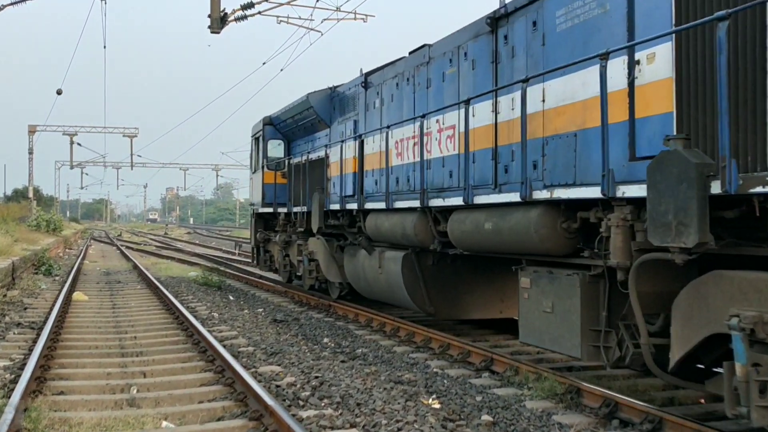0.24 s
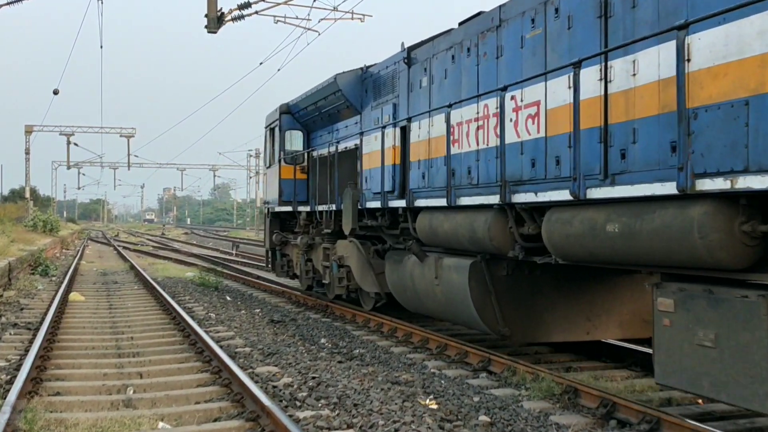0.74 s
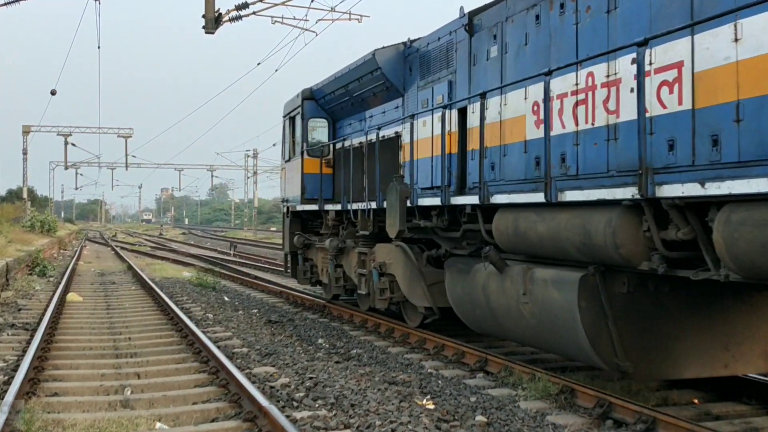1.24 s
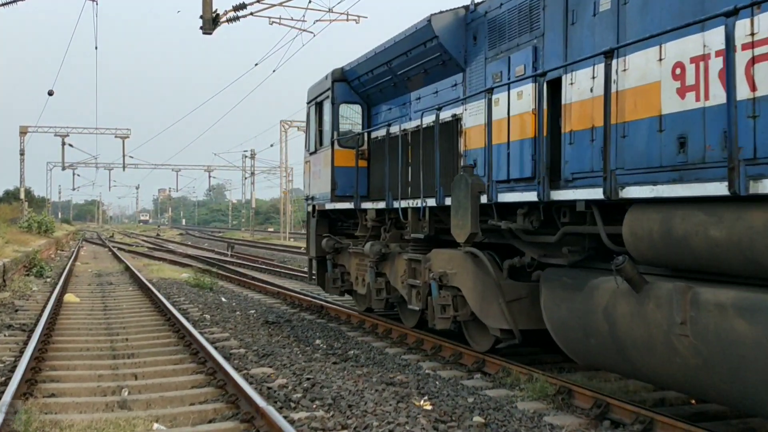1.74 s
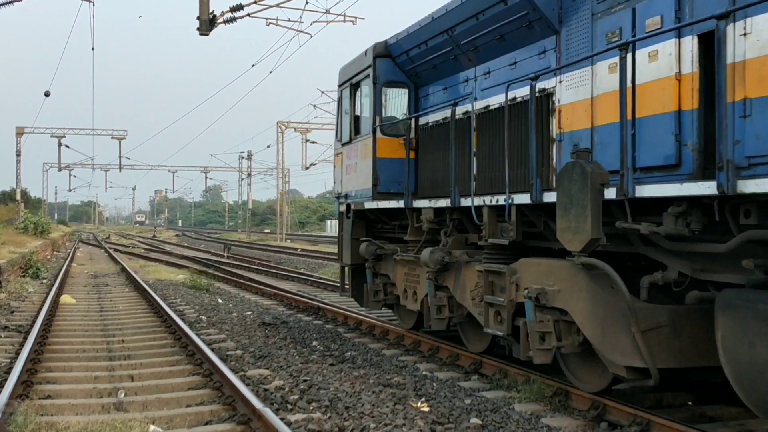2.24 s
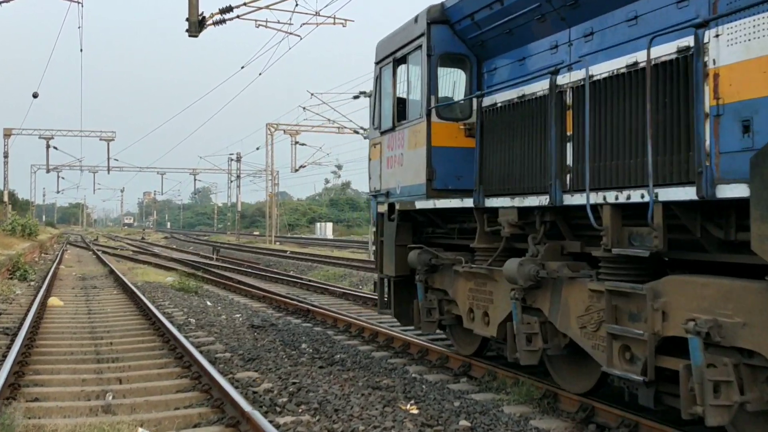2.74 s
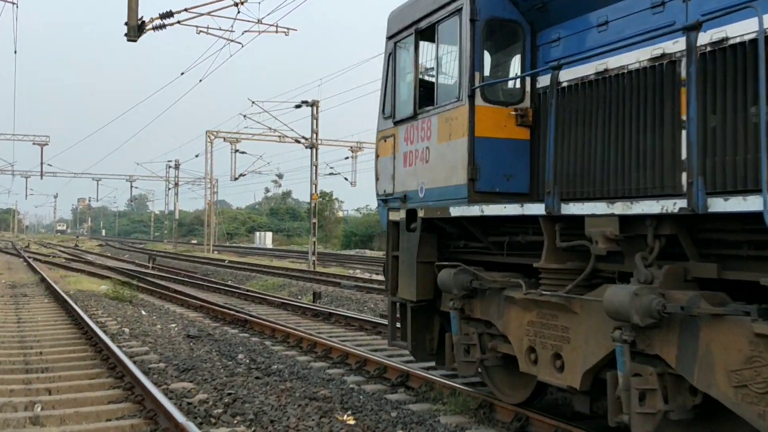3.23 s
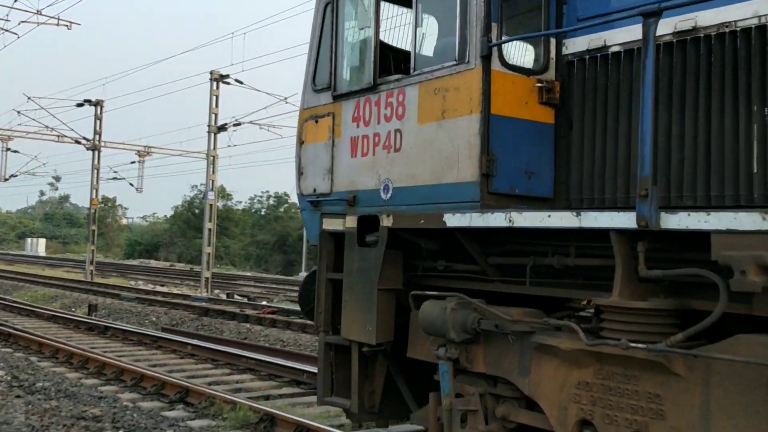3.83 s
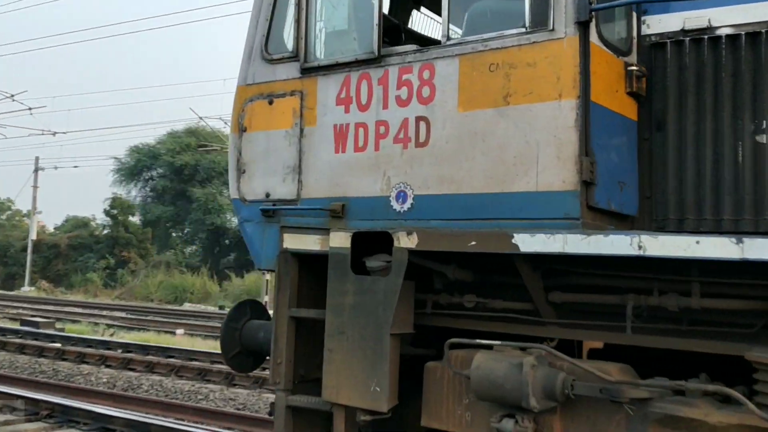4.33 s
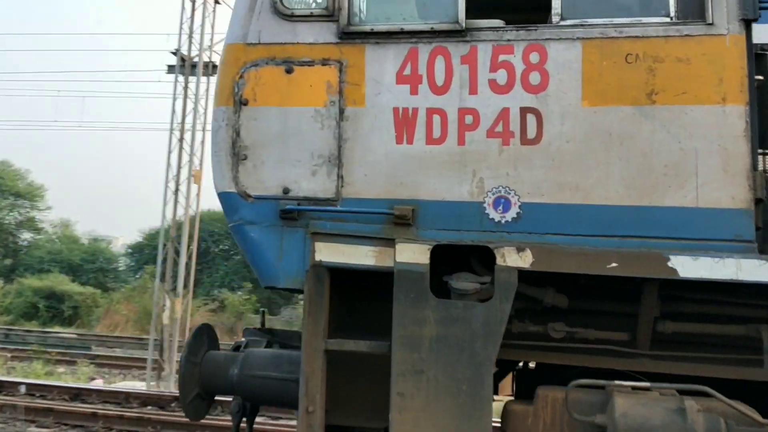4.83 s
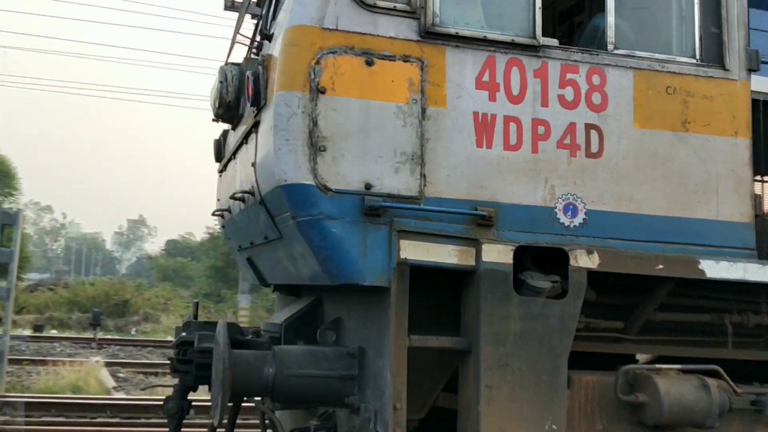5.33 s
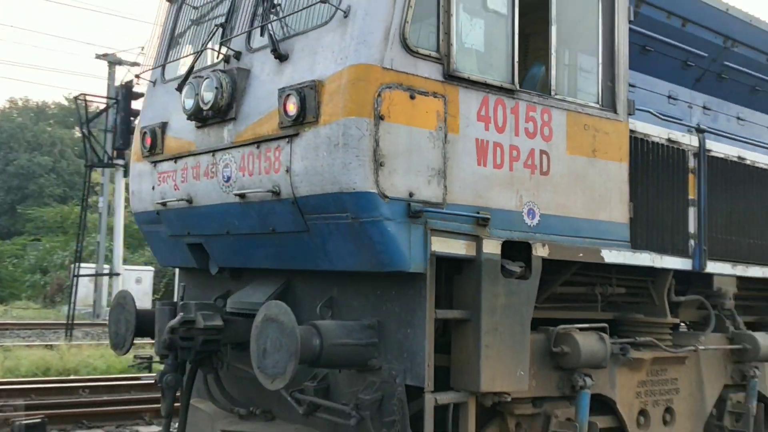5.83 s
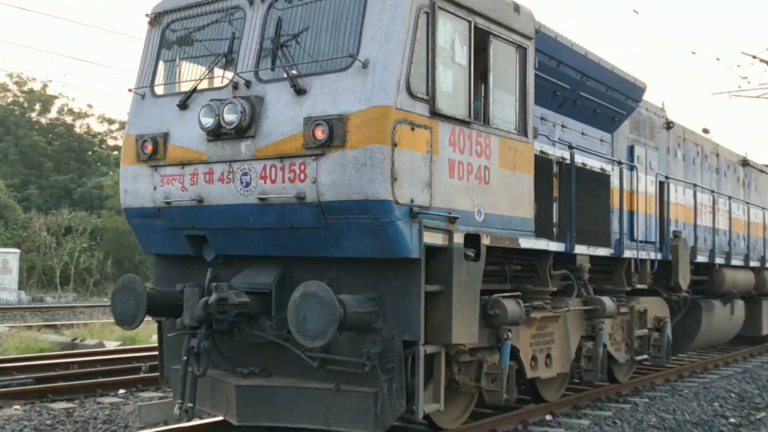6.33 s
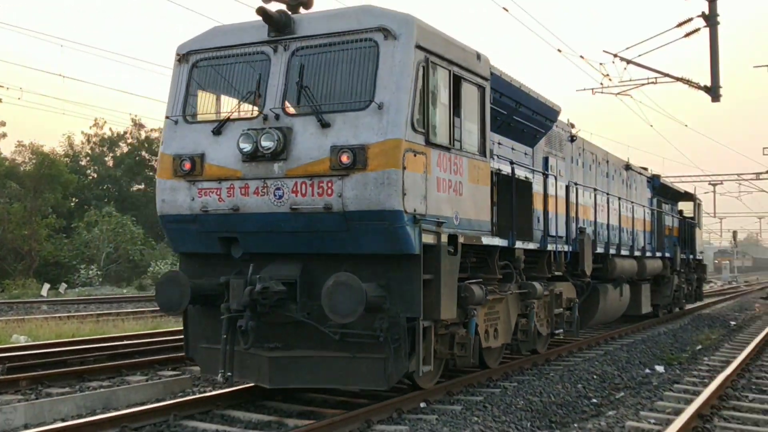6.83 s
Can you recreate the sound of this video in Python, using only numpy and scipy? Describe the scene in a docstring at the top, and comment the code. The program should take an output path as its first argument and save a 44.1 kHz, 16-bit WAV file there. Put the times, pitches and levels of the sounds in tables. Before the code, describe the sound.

A close stereo microphone by the track catches the end of a harsh low horn chord, a sharp air hiss and a brief ringing echo. Then come a passing diesel's rough rolling roar, fast engine throb, metallic clatter and thin gear whine. Early joint knocks are dull; a later cluster is heavier and more metallic. Finally the engine recedes, duller and more central, with faint whistles and soft chugging.

```python
"""A diesel locomotive rolls past at idle, close by: exhaust orders throb once a crank turn over clatter.
Gears whine as wavering tones, and wheels knock over rail joints as low thuds and ringing clanks.
Its two-reed air horn ends a blast, built from harmonics; the horn's echo returns a little sharp.
Shaped noise makes the rolling roar and the horn's escaping air.
The microphone pair turns to follow the engine away, so the delay between its ports closes."""
import sys
import numpy as np
from scipy import signal
from scipy.io import wavfile
from scipy.ndimage import uniform_filter1d, map_coordinates

SR = 44100
rng = np.random.default_rng(int(sys.argv[2]) if len(sys.argv) > 2 else 0)


def transcribe(u):
    """Save the signal u as a 16-bit wav file named by the first command-line argument.

    u: samples, shape (n,) or (channels, n), limited to [-1, 1]; the rate is SR.
    q: integer samples, one column per channel.
    """
    v = np.clip(np.atleast_2d(u).T, -1, 1)
    q = np.round(v * 32767).astype(np.int16)
    wavfile.write(sys.argv[1], SR, q)


N = 311787
SHUT_S = 0.473  # the horn valve shuts


def amp(db):
    """dB to gain."""
    return 10 ** (np.asarray(db) / 20)


def evened(x):
    """Scaled to rms 1."""
    return x / np.sqrt(np.mean(x ** 2) + 1e-20)


def read_spectrum(points, hz):
    """A spectrum read on a log-frequency axis."""
    f, value = np.transpose(points)
    return np.interp(np.log(hz + 1), np.log(f + 1), value)


def curves(rows, step=1):
    """Each column after the time, drawn as a curve with a point every step samples."""
    s, *cols = np.transpose(rows)
    t = np.arange(0, N + 2048, step)[:N] / SR
    return [np.interp(t, s, c) for c in cols]


def wander(count, n, rate_hz):
    """Slow complex random drift, rms 1 at its knots, one row per voice."""
    knots = rng.standard_normal((n // 200 + 200, count, 2)) @ [1, 1j]
    knots = signal.lfilter(*signal.butter(2, rate_hz / (SR / 400)), knots, axis=0)[190:]
    knots = knots / np.sqrt(np.mean(abs(knots) ** 2))
    return np.array([np.interp(np.arange(n) / 200, np.arange(len(v)), v) for v in knots.T])


def resonate(x, hz, width):
    """A resonance: shifts hz down to zero, smooths, and shifts back."""
    turn = np.exp(2j * np.pi * np.cumsum(hz * np.ones(x.shape[-1])) / SR)
    r = np.exp(-np.pi * width / SR)
    return 2 * (turn * signal.lfilter([1 - r], [1, -r], x / turn)).real


def rung(x, hz, width, second_width):
    """Two resonances at one pitch, in a row, scaled to rms 1."""
    return evened(resonate(resonate(x, hz, width), hz, second_width))


def noise(field_db, patchy_db, size=N, alike=0):
    """Stereo noise of even strength, coloured by a field of dB over frequency and time."""
    # Each row: frequency in Hz, left-right likeness from 0 to 1
    likeness = [(60, 0.99), (250, 0.98), (600, 0.84), (1400, 0.4), (3000, 0.1), (7000, 0.058),
                (15000, 0.11)]
    # Each row: frequency in Hz, left minus right in dB
    balance = [(60, -0.5), (180, 0), (550, 0.5), (1650, 1.5), (4970, 3.5), (15000, -3)]
    frames, hz = size // 256 + 5, np.fft.rfftfreq(1024, 1 / SR)
    a, b, c, d, patches = rng.standard_normal((frames, 513, 5)).T
    patches = evened(uniform_filter1d(uniform_filter1d(patches, 10, 0), 12, 1))
    same = read_spectrum(likeness, hz)[:, None]
    same = np.clip(same + alike * (1 - same), -1, 1)
    left = a + 1j * b
    z = np.array([left, same * left + np.sqrt(1 - same ** 2) * (c + 1j * d)])
    shape = amp(field_db(hz[:, None], frames))
    z *= shape / np.sqrt((shape ** 2).sum(0)) * amp(patchy_db * patches)
    z *= amp(np.array([.5, -.5])[:, None, None] * read_spectrum(balance, hz)[:, None])
    return evened(signal.istft(z, nperseg=1024, noverlap=768)[1][:, :size])


def passing(nearest_s, level_db, before_s, after_s):
    """Level in dB of a long part coming near, staying abreast, drawing away; 3 dB down at before and after."""
    t = np.arange(N) / SR - nearest_s
    return level_db - 10 * np.log10(1 + (t / np.where(t < 0, before_s, after_s)) ** 4)


def crank():
    """Turns of the crank as heard, its rate falling slightly as the engine passes; zero at a throb's crest."""
    crank_hz, fall_hz_per_s, crest_s = 4.53, .0057, 2.3
    turns = np.cumsum(crank_hz - fall_hz_per_s * np.arange(N) / SR) / SR
    return turns - turns[round(crest_s * SR)]


def turned_share():
    """How far the microphone pair has turned to face the engine, from 0 to 1."""
    turn_s, turning_s = 4.9, 0.43
    return np.clip((np.arange(N) / SR - turn_s) / turning_s, 0, 1)


def from_side(ports, lead_s):
    """The right port hears the sound later."""
    late = map_coordinates(ports[1], [np.arange(N) - SR * lead_s], order=5, mode="nearest")
    return np.array([ports[0], late])


def roar():
    """Wheels, fans and air as noise that dulls with distance.

    Rumble and treble start low under the horn blast, rise as it ends, then vary."""
    # The roar's course. Each row: time in seconds, roar level in dB, rumble change in dB, treble change in dB
    course = [(0, -34.5, -27, -11), (.58, -32, -14, -2), (.72, -32.5, -2, 2), (1.9, -29.5, 0, -1.5),
              (3, -29.5, -1.5, -5), (5.1, -32, 4, -3.5), (5.6, -35, 1, 1.5), (7.07, -39.5, -2, 1.5)]
    # Colour close by and far off, only the shape counts. Each row: frequency in Hz, density in dB per Hz
    near_colour = [(25, -38.5), (55, -29), (85, -8), (180, -7.5), (500, -9), (760, -12.5), (900, -19.5),
                   (2300, -18), (4100, -29.5), (5300, -17), (8000, -35.5), (10500, -47.5), (14200, -38),
                   (15800, -33)]
    far_colour = [(25, -24), (55, -22), (87, -11), (200, -5.5), (450, -17.5), (720, 1.5), (880, -23.5),
                  (1200, -20), (2600, -33), (5600, -36), (8700, -47.5), (10800, -73.5), (14200, -58),
                  (15800, -60)]
    nearest_s, half_far_s = 1.73, 3.8  # the colour is half way to far at half_far_s from the nearest moment
    chuff_db, chuff_turn = 3.5, .075  # swell near 700 Hz twice a turn, this part of a turn past the crest
    abreast_same, abreast_at_s, abreast_for_s = 0.23, 3.16, 0.68
    level_db = curves(course)[0]
    _, rumble_db, treble_db = curves(course, step=256)
    swell_db = chuff_db * turned_share() * np.cos(4 * np.pi * (crank() - chuff_turn))
    swell_db = np.pad(swell_db[::256], (0, 8), "edge")

    def field(hz, frames):
        away = (np.arange(frames) * 256 / SR - nearest_s) ** 2
        far = away / (away + half_far_s ** 2)
        rumble = np.exp(-np.log((hz + 1) / 200) ** 2 / .5) * rumble_db[:frames]
        chuff = np.exp(-np.log((hz + 1) / 700) ** 2 / 0.044) * swell_db[:frames]
        treble = treble_db[:frames] / (1 + (7500 / (hz + 1)) ** 4)
        colour = read_spectrum(near_colour, hz) * (1 - far) + read_spectrum(far_colour, hz) * far
        return colour + rumble + treble + chuff

    # the ports hear more alike while the nearest bogie is straight to the side
    abreast = (np.arange(N // 256 + 5) * 256 / SR - abreast_at_s) / abreast_for_s
    return amp(level_db) * noise(field, 1.69, alike=abreast_same * np.exp(-abreast ** 2))


def reed(pitch_hz, hold_db, fade, stall_s, pan_db, echo_db, sway, bell, size, scatter=0.21, rough=0.035):
    """A reed's pulses as harmonics; many moving paths make each swell and fade, differently at each port."""
    stall_db_per_s = 465
    dull_per_db = 0.5  # overtone loss in dB per octave for each dB of fade
    rise_per_db = .0012  # share the pitch creeps up for each dB of fade, over the first 20 dB
    echo_pitch, echo_t60_s, echo_tilt_db, echo_top_hz = 1.013, 1.37, 8.5, 3900  # tilt is per octave
    t, (sway_s, sway_db, width_s) = np.arange(size) / SR, sway
    drop_db = fade * np.maximum(t - SHUT_S, 0)  # the pressure bleeds away, then the reed stalls
    level_db = hold_db - drop_db - stall_db_per_s * np.maximum(t - stall_s, 0)
    hz = pitch_hz * (1 + rise_per_db * np.minimum(drop_db, 20))
    db, drift_db = np.transpose(bell)[:, :, None]
    k = np.arange(1, len(bell) + 1)[:, None]
    db = db + drift_db * (np.minimum(t, SHUT_S) - SHUT_S / 2)
    sway_db = sway_db * np.exp(-((t - sway_s) / width_s) ** 2) / k ** 0.34
    direct = amp(level_db + sway_db - dull_per_db * drop_db * np.log2(k))
    direct = direct * np.exp(2j * np.pi * k * np.cumsum(hz) / SR)
    direct *= np.exp(1j * 0.333 * k ** 2)  # the flared bell spreads each pulse in time
    # the echo keeps the steady pitch, raised by the motion towards the reflectors, and dies slowly
    r = 10 ** (-6 / (echo_t60_s * SR))
    echo = np.sqrt(signal.lfilter([1 - r], [1, -r], amp(2 * level_db)))
    echo = echo * amp(echo_db + echo_tilt_db * np.log2(k)) / (1 + (k * pitch_hz / echo_top_hz) ** 4)
    echo = echo * np.exp(2j * np.pi * k * echo_pitch * pitch_hz * t)
    ports, shared = [], wander(len(k), size, 5.4)
    for side in (.5, -.5):
        paths = 1 + 0.24 * shared + scatter * np.minimum(k - .8, 4) ** .5 * wander(len(k), size, 4.4)
        paths += rough * np.sqrt(k) * wander(len(k), size, 90.)  # turbulent air makes the reed flutter
        both = direct * paths + echo * wander(len(k), size, 10.4)
        ports.append(np.sqrt(2) * amp(side * pan_db) * (amp(db) * both).real.sum(0))
    return np.array(ports)


def horn():
    """Both reeds share the air, so weak sum and difference tones arise; air leaks past, then the valve vents."""
    # Harmonics from the first up. Each row: level in dB, drift in dB per s as the bell moves past
    low_bell = [(0, -2.5), (-8, 14.5), (-1.5, 2), (-4.5, -16), (-8, -16), (-13, -16), (-23, 2), (-20, -8),
                (-28, -6), (-37, -7), (-31, -6), (-26, -8)]
    high_bell = [(1.5, -4), (-6.5, -6), (-7.5, -22.5), (-18, 2), (-18, -4), (-26.5, -4), (-26.5, -7),
                 (-30, -5.5)]
    # Steady pitch of the low and the high reed in Hz
    reed_hz = (270.4, 466.6)
    # Each row, one a reed: level in dB before the bell, fade in dB per s once the valve shuts,
    # stall time in seconds, left minus right in dB, echo level in dB
    reed_rows = [(-20, 56, 0.72, -0.5, -25.5), (-18, 14, 0.608, 5, -22)]
    # The low reed swells once, the high reed dips once. Each row: time in seconds, change in dB, width in seconds
    sways = [(.36, 4.5, 0.049), (0.372, -10.5, 0.052)]
    # Colour of the escaping air, only the shape counts. Each row: frequency in Hz, density in dB per Hz
    leak_colour = [(2500, -26), (4300, -8.5), (5000, -6), (6200, 2), (7200, -12.5), (9000, -30)]
    vent_colour = [(1500, -18), (2300, -6), (3400, -11), (4100, -19.5), (5200, -6), (9000, -14.5),
                   (10800, -20.5), (13800, -10), (15800, -8)]
    leak_db, leak_rise_db, leak_fade_db_per_s = -35, 2, 95
    vent_db, vent_rise_s, vent_hold_s, vent_fade_db_per_s = -23, 0.021, 0.041, 405
    tail_db, tail_fade_db_per_s = -16, 133  # slower part of the vent, relative to vent_db
    n = round(1.5 * SR)
    reeds = zip(reed_hz, reed_rows, sways, (low_bell, high_bell))
    tone = sum(reed(hz, *row, sway, bell, size=n) for hz, row, sway, bell in reeds)
    mixed = 0.21 * tone ** 2
    mixed = mixed - uniform_filter1d(mixed, 600)  # takes out the slow push
    since = np.arange(n) / SR - SHUT_S
    opened = np.clip(since / vent_rise_s + .5, 0, 1)
    fading = np.maximum(since - vent_hold_s, 0)
    leak = amp(leak_db + leak_rise_db * opened - leak_fade_db_per_s * fading)
    leak = leak * noise(lambda hz, frames: read_spectrum(leak_colour, hz), 2.6, size=n)
    vent = amp(-vent_fade_db_per_s * fading) + amp(tail_db - tail_fade_db_per_s * fading)
    vent = opened * amp(vent_db) * vent
    vent = vent * noise(lambda hz, frames: read_spectrum(vent_colour, hz), 2.3, size=n)
    return np.pad(tone + mixed + leak + vent, ((0, 0), (0, N - n)))


def crack(x, clank_hz):
    """The dry crack over the ring; the higher the clank, the less its treble falls away."""
    dull = np.clip(.8 - .8 * np.log2(clank_hz / 1000), 0, .9)
    thinned = signal.sosfilt(signal.butter(1, 400, "hp", fs=SR, output="sos"), x)
    return signal.lfilter([1], [1, -dull], thinned)


def knocks():
    """Each joint shakes the frame (a rough low thud) and rattles the rail (a ringing clank under a dry crack)."""
    # Wheels over joints. Each row: start in seconds, thud level in dB, thud pitch in Hz, thud time scale in
    # seconds, clank level in dB, pitch the clank favours in Hz, crack level in dB
    joints = [(0.706, -23.5, 345, 0.056, -54, 1000, -41), (1.192, -28.5, 198, 0.03, -42, 1750, -31.5),
              (1.699, -25, 139, 0.037, -46, 1000, -43), (1.737, -22, 153, 0.017, -59, 1000, -55),
              (3.24, -42, 200, 0.03, -52, 1400, -39), (4.223, -18, 187, 0.055, -38.5, 900, -48),
              (4.286, -22.5, 128, 0.043, -47, 900, -53), (4.724, -28, 184, 0.11, -37.5, 1940, -44),
              (4.745, -23, 90.5, 0.11, -36, 1350, -53), (5.222, -24, 206, 0.032, -32, 1140, -44),
              (5.240, -19, 258.4, 0.051, -37, 800, -48)]
    # Rail modes. Each row: pitch in Hz, level in dB, approximate ring time to -60 dB in seconds
    rail = [(762, 6.5, 0.04), (883, 1, 0.056), (1353, 0, 0.1), (1760, -6, 0.05), (2030, -4, 0.03)]
    rattle_s, strike, strike_s = 0.026, 2.2, 0.002  # the rattle, and the first blow over it
    out, t = np.zeros(N + SR), np.arange(SR // 2) / SR
    low_pass = signal.butter(6, 6500, fs=SR, output="sos")
    shakes = rng.standard_normal((len(joints), len(t)))
    for (s, thud_db, hz, length, clank_db, clank_hz, crack_db), shake in zip(joints, shakes):
        swell = t / length * np.e * 1.15
        swell = swell * np.exp(-2.5 * t / length) * np.exp(-(t / length / 1.7) ** 4)
        shudder = np.cos(2 * np.pi * hz * t) + 0.38 * np.cos(4 * np.pi * hz * t)
        shudder += 0.59 * rung(shake, hz, hz * 1.3, hz * 1.3)
        rattle = signal.sosfilt(low_pass, shake)
        rattle = rattle * (np.exp(-(t / rattle_s) ** 2) + strike * np.exp(-t / strike_s))
        ring = 0
        for f, db, ring_s in rail:
            favour_db = -24 * np.log2(f / clank_hz) ** 2
            ring = ring + amp(db + favour_db) * resonate(rattle, f, 2.0 / ring_s) * np.sqrt(ring_s)
        clank = amp(clank_db) * ring / np.sqrt(np.mean(ring[:2200] ** 2))
        clank = clank + amp(crack_db) * crack(rattle, clank_hz)
        out[round(s * SR):][:len(t)] += amp(thud_db) * swell * shudder + clank
    return out[:N]


def whine(turns):
    """The gear mesh speeds and slows within each turn and fades in and out; thin whistles stand out late."""
    # Whine as panels and gaps pass before it. Each row: time in seconds, level in dB before the balance
    mesh_course = [(0, -53), (.72, -48), (.8, -44), (1.53, -42), (1.61, -32), (1.69, -45), (1.95, -36),
                   (2.16, -35.5), (2.21, -49), (2.27, -36), (2.62, -40), (2.72, -52), (2.9, -37.5),
                   (3.9, -40.5), (4.2, -50), (4.45, -45), (4.56, -51.5), (4.65, -40.5), (4.85, -57),
                   (5.2, -52), (5.9, -59), (6.4, -55.5), (7.07, -52.5)]
    # The second gear pair. Each row: time in seconds, level in dB before the wavering
    upper_course = [(2, -55), (4.5, -57), (5.1, -66), (5.57, -59), (5.85, -65), (6.17, -58.5), (6.7, -67),
                    (7.07, -63)]
    # Whistles. Each row: pitch in Hz, width in Hz of each of two resonances, level in dB,
    # start and end in seconds of the time it stands out
    whistles = [(1065, 30, -57, 5.5, 7.5), (1421, 20, -53, 5.58, 6.76), (2110, 170, -50.5, 5.54, 6.42),
                (4860, 110, -62.5, 5.9, 7.4)]
    mesh_hz, creep_hz, settled_s = 2543, 18, 3.5  # creeps up, then holds
    upper_hz, upper_fall_hz_per_s = 4040, 6.7
    balance_db = np.array([[1.], [-3.]])  # left, right
    breeze, t = rng.standard_normal(N), np.arange(N) / SR
    speed = 1 + .0044 * np.sin(2 * np.pi * turns) + .0013 * wander(1, N, 14.)[0].real
    mesh = np.cumsum((mesh_hz + creep_hz * np.minimum(t / settled_s, 1)) * speed) / SR
    upper = np.cumsum((upper_hz - upper_fall_hz_per_s * t) * speed) / SR
    mesh_fade = .95 + .3 * wander(2, N, 22.) + .42 * wander(1, N, 15.)
    upper_fade = .8 + 0.75 * wander(2, N, 12.0)
    out = np.sqrt(2) * amp(curves(mesh_course)[0] + balance_db) * (mesh_fade * np.exp(2j * np.pi * mesh)).real
    out += np.sqrt(2) * amp(curves(upper_course)[0]) * (upper_fade * np.exp(2j * np.pi * upper)).real
    for f, width, faint_db, s, end in whistles:
        swell = np.clip(np.minimum(t - s, end - t) / 0.53, .2, 1)  # a fifth remains outside its time
        out += amp(faint_db) * swell * rung(breeze, f, width, width)
    return out


def engine(turns):
    """Exhaust orders throb each turn, the upper group a quarter turn earlier; clatter rings the casing."""
    # Each row: crank order in cycles per turn, relative level in dB
    exhaust_orders = [(15, -6), (16, 1.5), (17, 10), (19, 0.5), (20, -5.5), (21, 0.5), (23, 7)]
    # Casing modes. Each row: pitch in Hz, first resonance width in Hz, relative level in dB
    casing = [(665.5, 26, 4), (710.7, 23.2, 6)]
    bank_db = -56.5  # one bank's beat, order 8, carries evenly through the ground
    exhaust_db = passing(nearest_s=2.5, level_db=-35, before_s=1, after_s=2)
    clatter_db = passing(nearest_s=2, level_db=-33, before_s=0.92, after_s=1.5)
    exhaust = 0
    for k, db in exhaust_orders:
        early = 0.2504 * (k > 18)  # orders above the firing group crest a quarter turn earlier
        exhaust = exhaust + amp(db) * np.cos(2 * np.pi * k * (turns + early))
    pattern = rng.standard_normal(2001)  # the part of the clatter that repeats each turn
    lumps = amp(1.7 * evened(uniform_filter1d(rng.standard_normal(N), 900)))
    taps = 0.49 * np.interp(turns % 1 * 2000, np.arange(2001), pattern)
    taps = taps + 0.54 * rng.standard_normal(N) + 0.2 * rng.standard_normal((2, N))  # shared, then per port
    clatter = sum(amp(db) * rung(taps * lumps, hz, width, 3 * width) for hz, width, db in casing)
    bank = amp(bank_db) * np.sqrt(2) * np.cos(2 * np.pi * 8 * turns)
    return bank + amp(exhaust_db) * evened(exhaust) + amp(clatter_db) * evened(clatter)


def scene():
    """All sources at the two microphone ports."""
    side_lead_s = 0.000379  # the left port leads by this for a sound from the side
    enter_s, abreast_s = 0.4, 3.3  # the body of the engine moves from straight ahead to the side
    body_share = 0.88  # being long, it never lies wholly to the side
    t = np.arange(N) / SR
    lead_s = side_lead_s * (1 - turned_share())
    crossing = body_share * np.clip((t - enter_s) / (abreast_s - enter_s), 0, 1)
    wheels = (crossing + body_share) / 2
    turns = crank()
    out = from_side(horn() + whine(turns), lead_s)
    out += from_side(engine(turns), lead_s * crossing)
    # roar is stereo, the knocks join both of its ports
    return out + from_side(roar() + knocks(), lead_s * wheels)


def record(dry):
    """The input stage rounds off the highest peaks; then the band limit."""
    edge_hz = 15900
    dry = dry / (1 + (abs(dry) / .9) ** 4) ** .25
    low_pass = signal.firwin(1501, edge_hz, window=("kaiser", 9), fs=SR)
    return signal.oaconvolve(dry, low_pass[None], "same")


dry = scene()
out = record(dry)
transcribe(out)
```